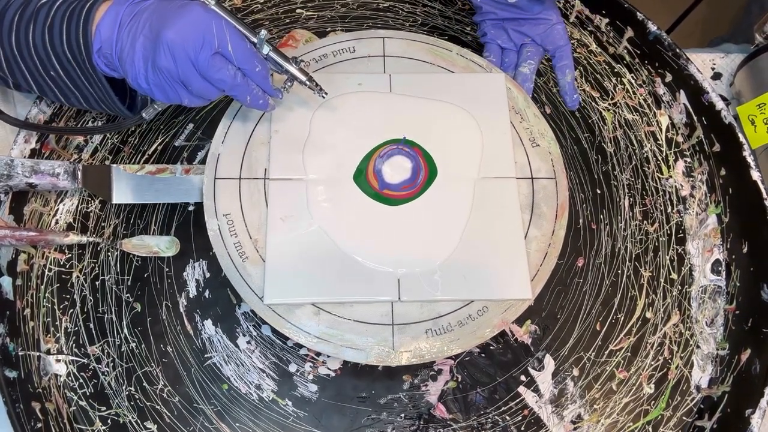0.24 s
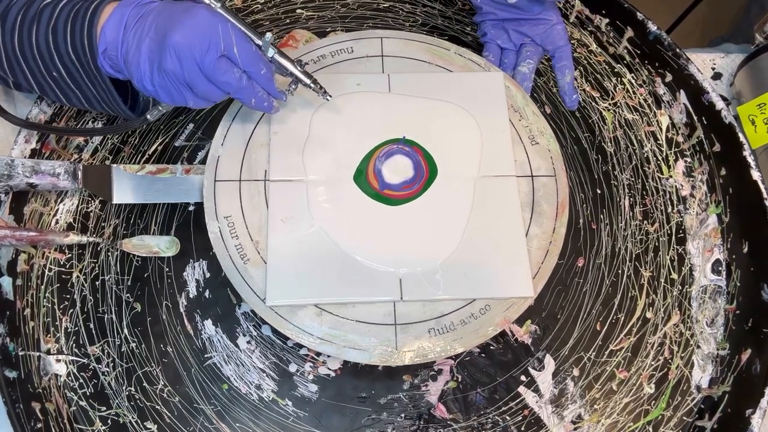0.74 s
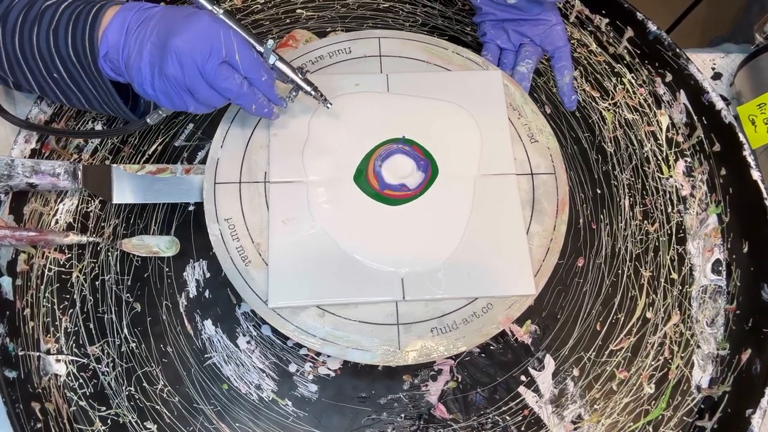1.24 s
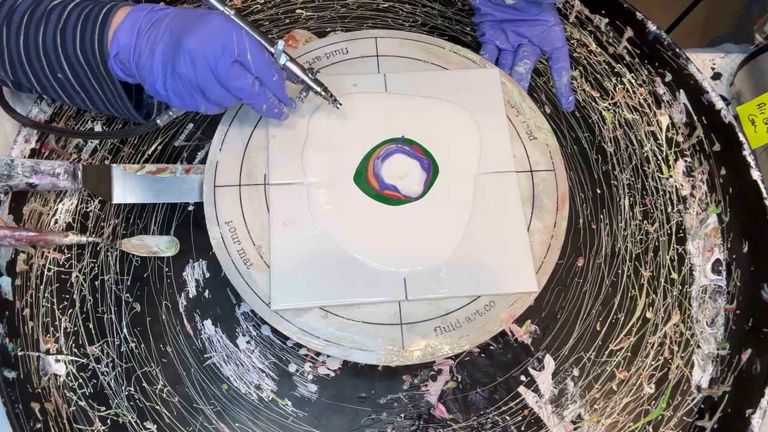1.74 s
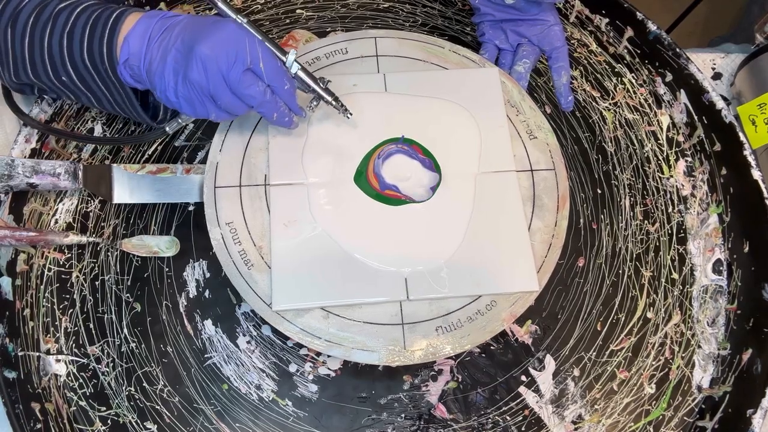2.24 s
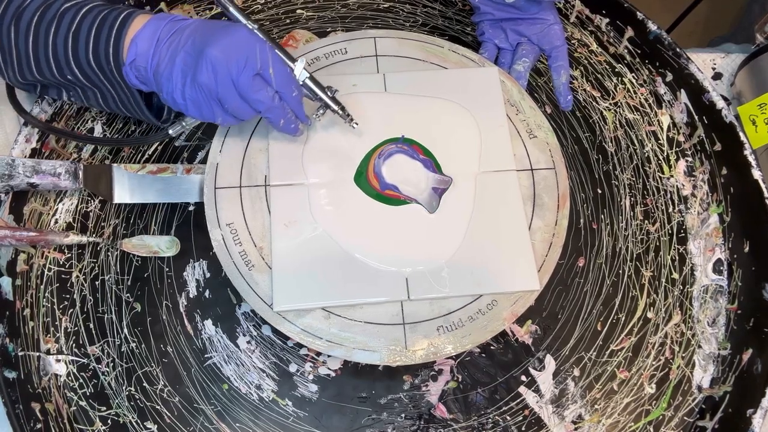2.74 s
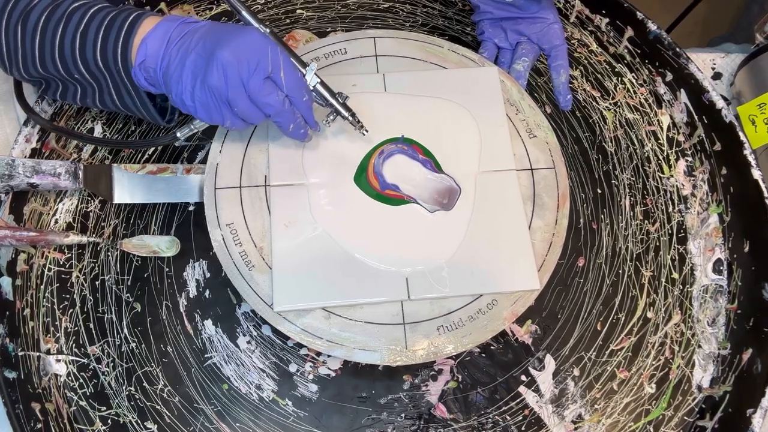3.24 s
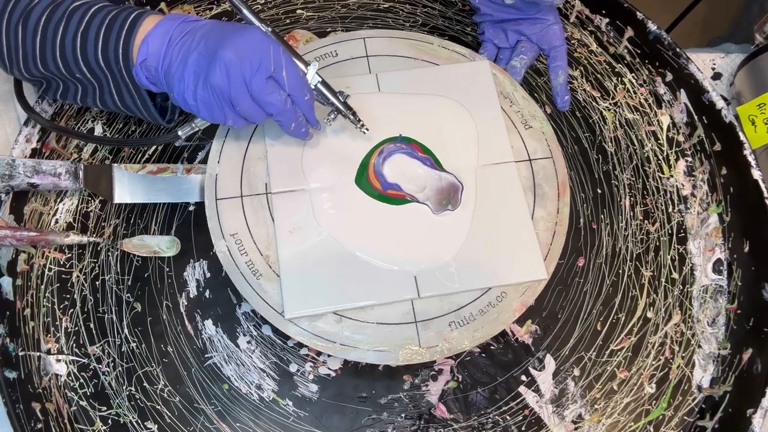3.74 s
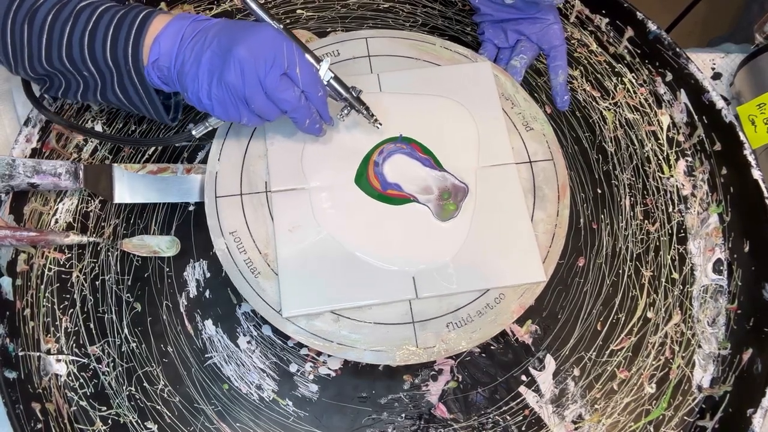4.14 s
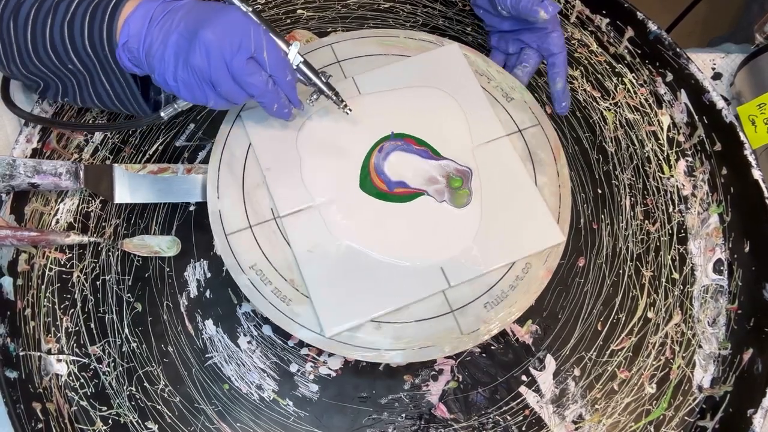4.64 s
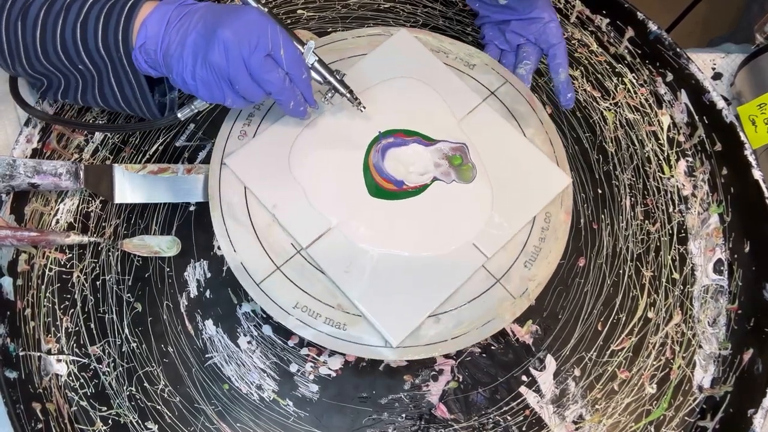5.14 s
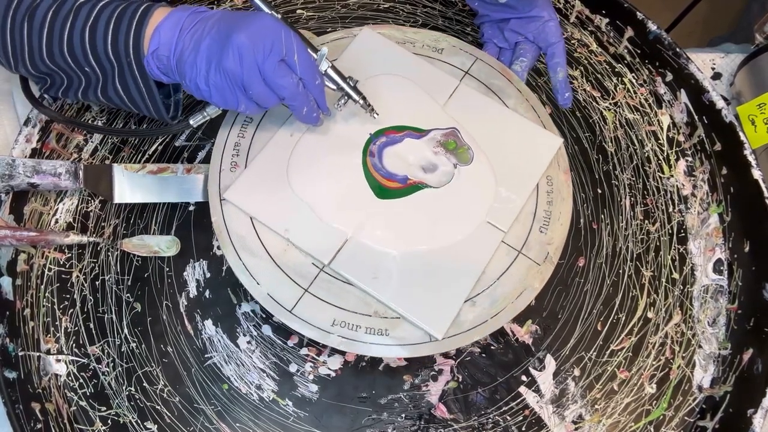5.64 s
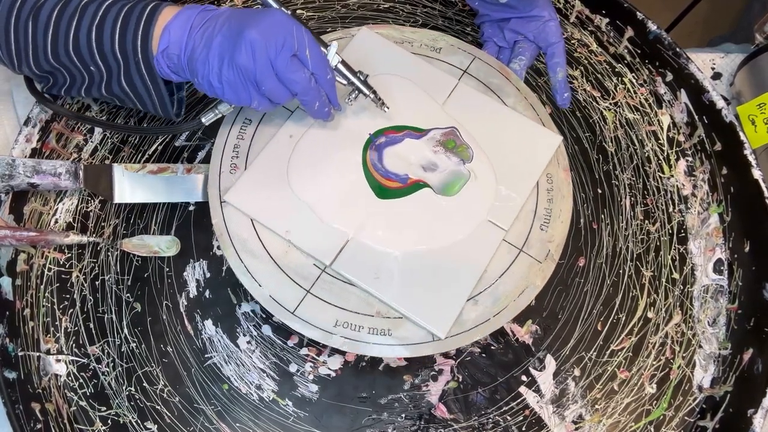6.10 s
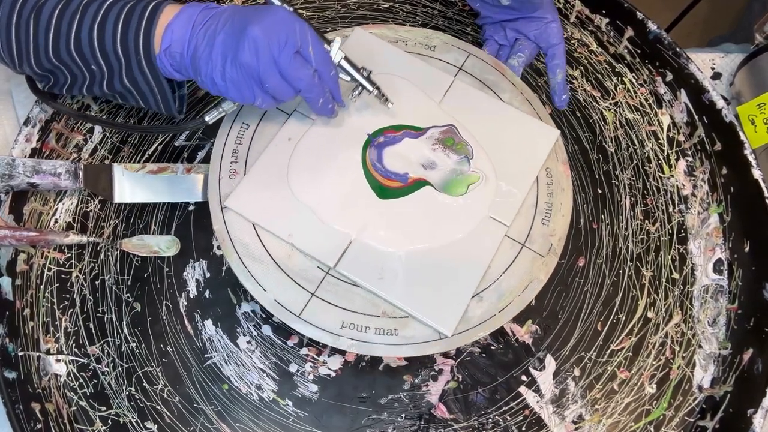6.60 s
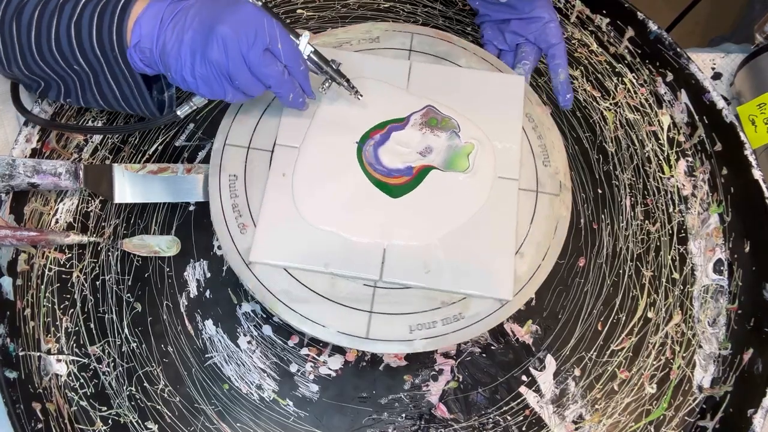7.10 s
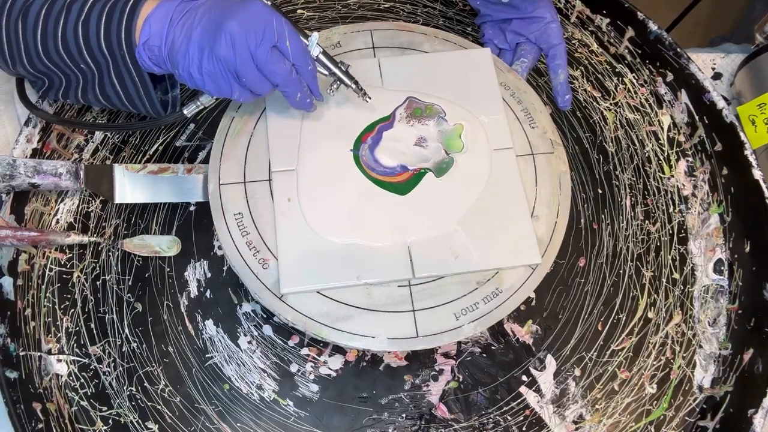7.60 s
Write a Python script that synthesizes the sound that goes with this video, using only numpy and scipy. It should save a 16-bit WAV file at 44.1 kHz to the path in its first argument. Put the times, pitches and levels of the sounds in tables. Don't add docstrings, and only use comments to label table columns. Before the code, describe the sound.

A small air compressor starts within the first tenth of a second and keeps running, its valve knocking so fast that it blurs into a rattling buzz with a woody, tinny ring and mains hum below. Over it lies a steady, crisp jet of air from an airbrush moving across wet paint. Close stereo pickup, dry indoor space, no voices.

```python
import sys
import numpy as np
from scipy import signal
from scipy.fft import rfft, irfft, next_fast_len
from scipy.io import wavfile
from scipy.ndimage import map_coordinates

SR = 44100
rng = np.random.default_rng(int(sys.argv[2]) if len(sys.argv) > 2 else 0)


def decibels_to_gain(level_db):
    exponent = np.asarray(level_db, float) / 20
    return 10 ** exponent


def materialize(psi):
    bounded = np.clip(np.atleast_2d(psi).T, -1, 1)
    quanta = np.round(bounded * 32767).astype(np.int16)
    wavfile.write(sys.argv[1], SR, quanta)


N = 346626

# (time [s], level [dB])
JET_FLOW = [
    (0.0, -43.5),
    (0.08, -42),
    (0.42, -41),
    (1.47, -39.5),
    (4.24, -40),
    (4.99, -38),
    (5.06, -39.5),
    (6.39, -40),
    (7.77, -39),
    (7.86, -39.5),
]
# (frequency [Hz], density [dB per Hz])
JET_MID_COLOUR = [(1350, -16), (2300, -15.5), (3250, -13), (4300, -11.5), (5400, -9), (7100, -10.5),
                  (8300, -4), (9900, -0.5), (11300, 1), (13200, -1), (15150, -8)]
# (frequency [Hz], density [dB per Hz])
JET_SIDE_COLOUR = [(1350, -42), (2300, -11), (2670, -21), (3640, -14.5), (5290, -13.5), (6980, -7.5),
                   (8250, -5.5), (9600, -13), (10250, -26), (10400, -70), (11550, -68), (11700, -13.5),
                   (14900, 0), (15800, -6)]
# (time [s], delay [ms])
PLATE_PATH = [
    (0, .28),
    (1, .27),
    (2.3, .27),
    (3, .3),
    (4.1, .3),
    (4.5, .27),
    (5.1, .3),
    (7.86, .3),
]
# (frequency [Hz], density [dB per Hz])
WHIRR_MID_COLOUR = [(20, -2), (45, -6.5), (60, 12), (120, -15), (200, 0.5), (280, -2), (500, 0),
                    (750, -3.5), (930, 1), (1100, -1.5), (1650, -9.5), (1800, -13.5), (2600, -11.5),
                    (4000, -17.5)]
# (frequency [Hz], density [dB per Hz])
WHIRR_SIDE_COLOUR = [(20, -25), (100, -5.5), (200, -11), (400, -31), (930, -30), (1200, -40), (1650, -16),
                     (1900, -22.5), (2300, -34), (2700, -33), (4000, -34)]
# (multiple of shaft speed [1], level [dB rms], crank angle of the crest [turns])
SHAFT_ORDERS = [(2, -50.5, -0.11), (3, -40.5, -0.14), (4, -35, -0.062), (5, -46.5, -0.055),
                (6, -53, -0.052), (7, -54, -0.0245)]
# (shaft multiple added [1], level [dB rms], start [cycles])
MAGNETIC_HUM = [(0, -39.5, 0.44), (1, -49, 0.63), (2, -55.5, 0.096), (3, -59, 0.24), (-1, -55, 0.49)]
# (onset as crank angle at steady speed [turns], frequency
# [Hz], t60 [s], left level [dB], right level [dB], left lag [ms])
RING_MODES = [(0.2368, 345.7, 0.06, -40.5, -44.3, 0.045), (0.878, 397.7, 0.0885, -35.0, -30.0, 0.413),
              (0.1366, 419.2, 0.0409, -35.4, -32.7, 0.211), (0.8757, 490.6, 0.0241, -40.7, -35.6, 0.911),
              (0.323, 535.8, 0.0757, -61.0, -38.4, -0.537), (0.862, 600.5, 0.0657, -39.9, -32.3, 0.457),
              (0.6991, 674.4, 0.1793, -42.8, -40.1, 0.424), (0.5594, 713.6, 0.02, -30.9, -28.6, 0.322),
              (0.0536, 799.9, 0.0981, -39.1, -40.0, 0.658), (0.626, 860.0, 0.0607, -37.1, -27.9, -0.071),
              (0.4648, 906.7, 0.0846, -23.5, -16.2, -0.514), (0.007, 946.7, 0.0506, -29.3, -22.5, 0.266),
              (0.4237, 972.2, 0.0939, -32.4, -25.9, 0.392), (0.4345, 1045.5, 0.0269, -35.8, -28.6, 0.376),
              (0.4807, 1168.4, 0.0178, -36.8, -27.2, 0.346), (0.6431, 1182.2, 0.0326, -41.0, -50.3, 0.154),
              (0.7574, 1308.5, 0.0315, -44.2, -39.7, 0.165), (0.5267, 1447.9, 0.026, -38.2, -63.5, -0.083),
              (0.9543, 1462.1, 0.0593, -48.8, -49.7, -0.007),
              (0.7119, 1504.6, 0.0798, -46.9, -45.7, -0.124), (0.716, 1623.1, 0.0585, -42.6, -43.1, 0.098),
              (0.4734, 1664.6, 0.0209, -39.2, -30.1, 0.28), (0.6075, 1677.9, 0.0428, -37.7, -41.1, -0.124),
              (0.5137, 1919.1, 0.0295, -46.9, -43.8, 0.254), (0.8799, 2068.9, 0.1309, -57.6, -58.5, 0.087),
              (0.4738, 2118.5, 0.1696, -50.5, -61.9, -0.001),
              (0.8796, 2272.7, 0.0314, -54.9, -58.1, -0.199), (0.5217, 2284.7, 0.0247, -49.9, -47.0, -0.2)]
# (frequency [Hz], left change [dB], right change [dB], shift [ms])
RINGS_AT_LOW_PRESSURE = [(345, .5, 1.8, -.25), (398, -3, -3, -.35), (420, -7.5, -7.8, -.52),
                         (490, .8, 2.6, -.4), (600, -11, -6.4, -.4), (800, 2, 1.7, -.31),
                         (860, 3, -3.4, -.28), (907, -3.5, .2, -.21),
                         (947, -2.5, -3.9, -.27), (972, -6.8, -3.2, -.22), (1045, -7.6, -9.1, -.2),
                        (1170, -2.5, -1.5, -.23), (1310, 1.5, 0, -.27), (1620, .5, 0, -.25),
                        (1920, -2, -3, -.2), (2100, -9, -10, -.25)]
# (level at full pressure [dB], change while pressure is low [dB])
RUNNING_LEVELS = [
    (0.45, 2.1),
    (0.46, -3),
    (2.5, .5),
]
IDLE_DB, SPIN_UP_DB, SPIN_UP_DB_PER_S = (-40, -17, -5.5), (-9, -15, 4), (22, 130, 27)

MAINS_HZ = 120.047
STEADY_TURN_S = 1 / 27.675
LOADED_TURNS_PER_S, SAG_PER_S2 = 27.69764, .006793
UNLOADED_EXTRA_TURNS_PER_S, PRESSURE_S = .24402, 1.30473
SWITCH_ON_S, VALVE_SEATS_S, EDGE_S = .036, .11, .01


def in_time(rows):
    s, *columns = np.transpose(rows)
    return [np.interp(np.arange(N) / SR, s, column) for column in columns]


def coloured(spectrum, edges_hz=(), white=None):
    size = next_fast_len(N)
    hz = np.arange(size // 2 + 1) * SR / size + 1
    table = np.array(spectrum)
    if white is None:
        white = rfft(rng.standard_normal(size))
    tone = white * decibels_to_gain(np.interp(np.log(hz), np.log(table[:, 0]), table[:, 1], -99, -99))
    below = [0 * hz] + [1 / (1 + (hz / edge) ** 24) for edge in edges_hz] + [0 * hz + 1]
    parts = irfft(tone * np.diff(below, axis=0), size)[:, :N]
    return parts / np.std(parts.sum(axis=0))


def drift(rate_hz):
    knots = rng.standard_normal(int(N / SR * rate_hz) + 3)
    return map_coordinates(knots, [np.arange(N) / SR * rate_hz], order=3)


def jet():
    flow_db, = in_time(JET_FLOW)
    swing_db = np.outer([1.1, 1], flow_db - flow_db.mean())
    gains = decibels_to_gain(swing_db + 0.26 * drift(6.1) + 0.11 * drift(30))

    port_lag_s, bright_alike, alike_from_hz = .0915 / 1000, .85, 6500
    shared, own = rfft(rng.standard_normal((2, next_fast_len(N))))
    hz = np.linspace(1, SR / 2, len(own))
    alike = bright_alike / (1 + (alike_from_hz / hz) ** 6)
    lagging = 1j * np.sign(np.tan(np.pi * hz * port_lag_s)) * alike * shared
    late = lagging + np.sqrt(1 - alike ** 2) * own
    fringe_edge_hz = (7700,)
    mid = decibels_to_gain(-41.5) * gains * coloured(JET_MID_COLOUR, fringe_edge_hz, shared)
    side = decibels_to_gain(-41.0) * gains * coloured(JET_SIDE_COLOUR, fringe_edge_hz, late)

    delay_ms, = in_time(PLATE_PATH)
    back = np.arange(N) - (delay_ms + 0.004 * drift(3.2)) * SR / 1000
    echo_gain = decibels_to_gain(-19 + 190 * (.3 - delay_ms))
    ports = []
    for fringe, core in (mid + side, mid - side):
        echo = echo_gain * map_coordinates(core, [back], order=3)
        ports.append(fringe + core + echo)
    return np.array(ports)


def unloaded(t):
    return np.exp(-t / PRESSURE_S)


def load(t):
    on, seated = (np.clip((t - start) / EDGE_S, 0, 1) for start in (SWITCH_ON_S, VALVE_SEATS_S))
    levels = []
    for idle, spin, climb, (full, low) in zip(IDLE_DB, SPIN_UP_DB, SPIN_UP_DB_PER_S, RUNNING_LEVELS):
        starting = idle + on * (spin + climb * (t - SWITCH_ON_S) - idle)
        running = full + low * unloaded(t)
        levels.append((1 - seated) * starting + seated * running)
    return levels


def whirr(turns):
    swell = decibels_to_gain(0.7 * np.cos(2 * np.pi * (turns - .68)))
    mid = decibels_to_gain(-48.0) * coloured(WHIRR_MID_COLOUR)[0]
    side = decibels_to_gain(-50.5) * coloured(WHIRR_SIDE_COLOUR)[0]
    return swell * np.array([0.5 * (mid + side), mid - side])


def hum(turns, t):
    shaft = sum(decibels_to_gain(db) * np.cos(2 * np.pi * int(k) * (turns - crest)) for k, db, crest in SHAFT_ORDERS)
    mains = sum(decibels_to_gain(db) * np.cos(2 * np.pi * (MAINS_HZ * t + int(k) * turns + start))
                for k, db, start in MAGNETIC_HUM)
    sway = decibels_to_gain(-49 - 6.5 * t) * (1 - np.exp(-t / .15))
    rocking = sway * np.cos(4 * np.pi * (turns + .085))
    return np.sqrt(2) * (shaft + mains + rocking) * decibels_to_gain(.15 * drift(4.9))


def clicks_at(times, sizes):
    at = np.clip(times * SR, 0, N - 2)
    whole, out = at.astype(int), np.zeros(N)
    out[whole] = sizes * (1 - at + whole)
    out[whole + 1] = sizes * (at - whole)
    return out


def ring(clicks, hz, t60):
    w, rise = 2 * np.pi * hz / SR, .3 * t60
    poles = [decibels_to_gain(-60 / (decay * SR)) for decay in (rise, t60)]
    sos = [[0, np.sin(w), 0, 1, -2 * r * np.cos(w), r * r] for r in poles]
    return signal.sosfilt(sos, clicks + 1e-18) * 2 * np.log(1000) / (rise * SR)


def casing(turns, t, blow_db):
    out = np.zeros((2, N))
    blows = np.interp(np.arange(int(turns[-1]) + 1) + .5, turns, t)
    haste, force = rng.standard_normal((len(blows), 2)).T
    force_db = np.interp(blows, t, blow_db) + 0.043 * force

    ripple_ms = .092 * np.cos(2 * np.pi * (MAINS_HZ * blows - .095))
    accent_db = -2.4 * np.cos(2 * np.pi * (MAINS_HZ * blows - .05))
    ripple_from_hz, accent_up_to_hz = 520, 1010

    slack = np.clip(unloaded(blows) / .55, 0, 1)
    at_hz, *changes = np.transpose(RINGS_AT_LOW_PRESSURE)
    left_slack_ms = .05 * slack

    for angle, hz, t60, left_db, right_db, lag_ms in RING_MODES:
        share = 1 / (1 + (ripple_from_hz / hz) ** 4)
        delay = (angle + (angle < .4) - .5) * STEADY_TURN_S
        times = blows + delay + (share * ripple_ms + 0.011 * haste) / 1000
        ring_accent_db = share * accent_db / (1 + (hz / accent_up_to_hz) ** 12)
        uneven_db = 0.28 * rng.standard_normal(len(blows))
        sizes = decibels_to_gain(force_db + ring_accent_db + uneven_db) * (times < t[-1])
        left_more, right_more, shift_ms = (slack * np.interp(np.log(hz), np.log(at_hz), change)
                                           for change in changes)
        left_times = times + (lag_ms + shift_ms + left_slack_ms) / 1000
        left = clicks_at(left_times, sizes * decibels_to_gain(left_db + left_more))
        right = clicks_at(times + shift_ms / 1000, sizes * decibels_to_gain(right_db + right_more))
        out += ring(np.array([left, right]), hz, t60)
    return out


def valve_puff(turns):
    gate = np.exp(-((turns - .51) % 1) / 0.19)
    sos = signal.butter(2, [1900, 4200], "band", fs=SR, output="sos")
    return decibels_to_gain(-45.5) * gate * signal.sosfilt(sos, rng.standard_normal((2, N)))


def scene():
    t = np.arange(N) / SR
    turns_per_s = LOADED_TURNS_PER_S - SAG_PER_S2 * t + UNLOADED_EXTRA_TURNS_PER_S * unloaded(t)
    turns = np.cumsum(turns_per_s) / SR
    blow_db, hum_db, whirr_db = load(t)
    motor = decibels_to_gain(whirr_db) * whirr(turns) + decibels_to_gain(hum_db) * hum(turns, t)
    valve = casing(turns, t, blow_db) + decibels_to_gain(blow_db) * valve_puff(turns)
    return jet() + motor + valve


def top_cut(x):
    return signal.sosfilt(signal.butter(12, 15750, fs=SR, output="sos"), x)


def record(dry):
    return top_cut(dry)


dry = scene()
out = record(dry)
materialize(out)
```